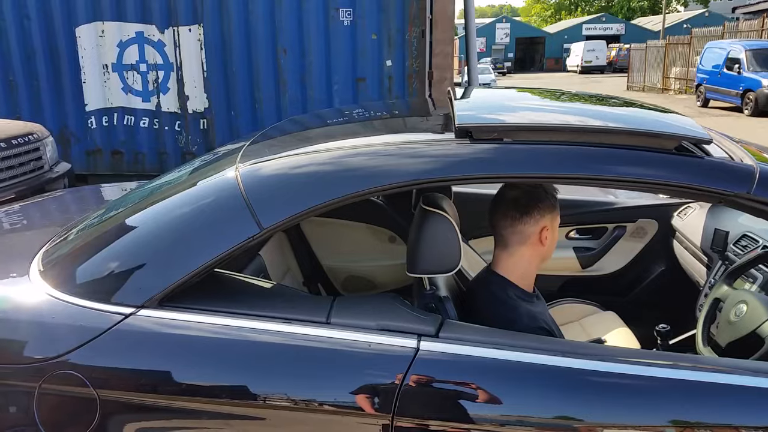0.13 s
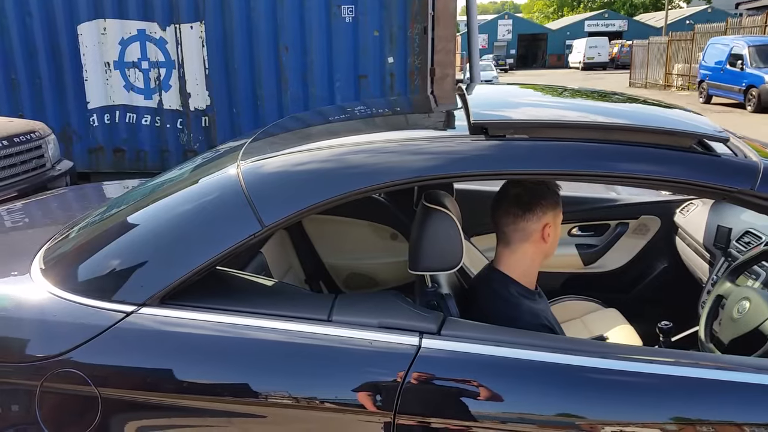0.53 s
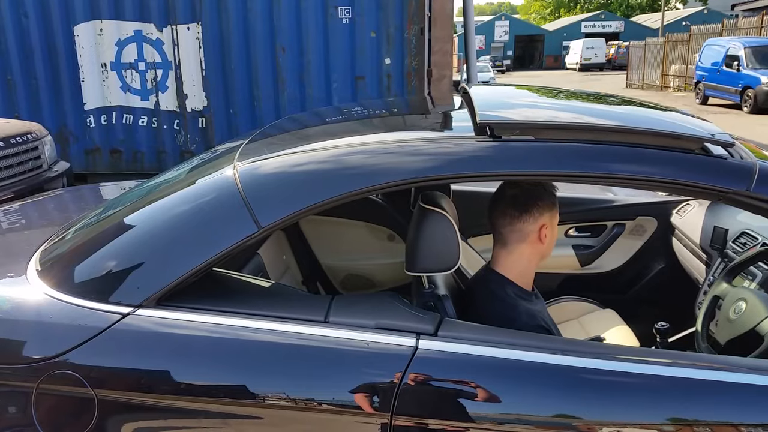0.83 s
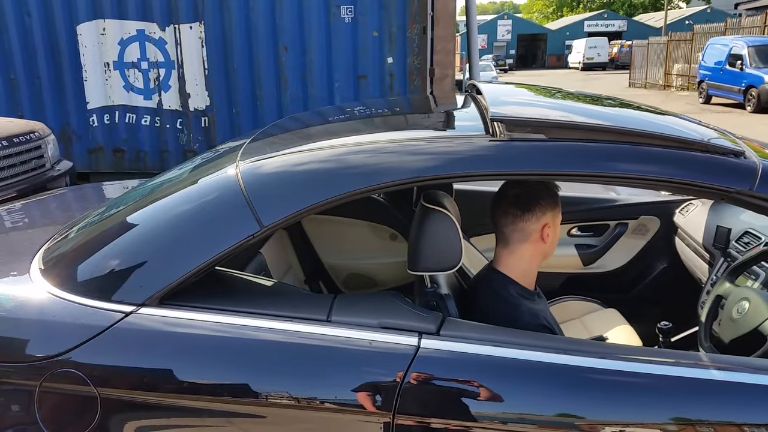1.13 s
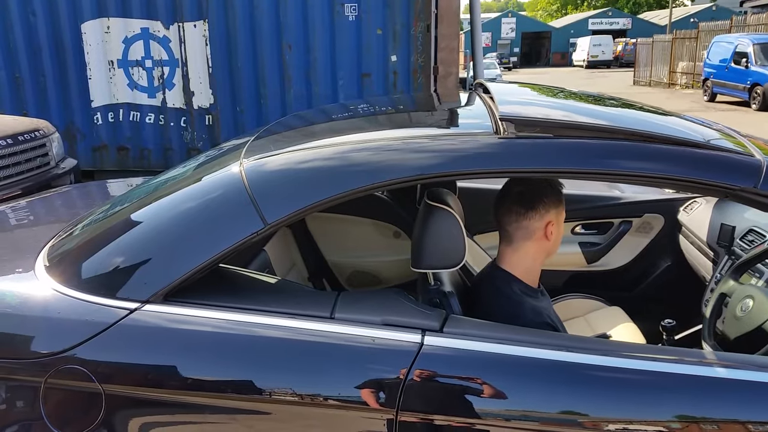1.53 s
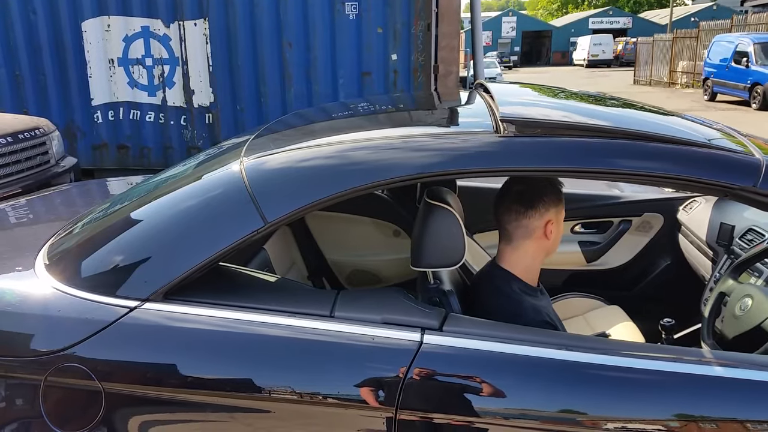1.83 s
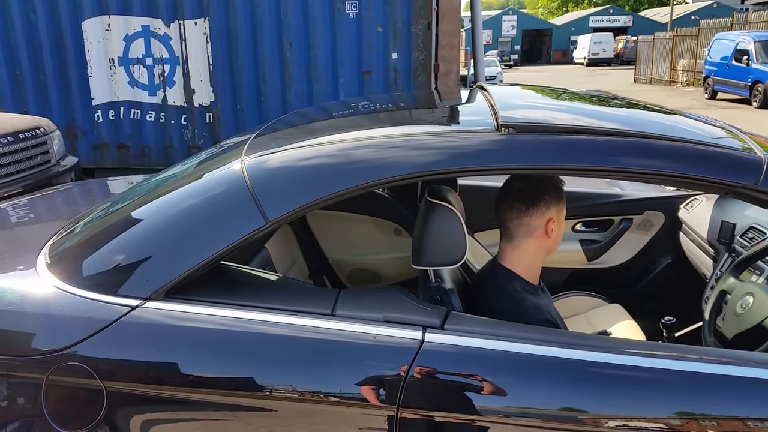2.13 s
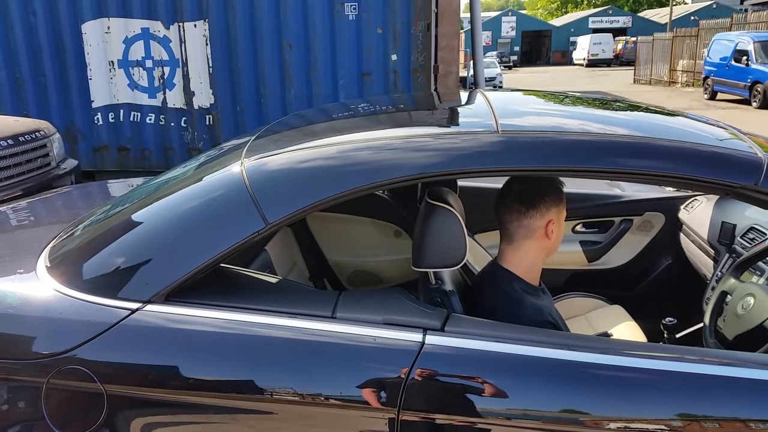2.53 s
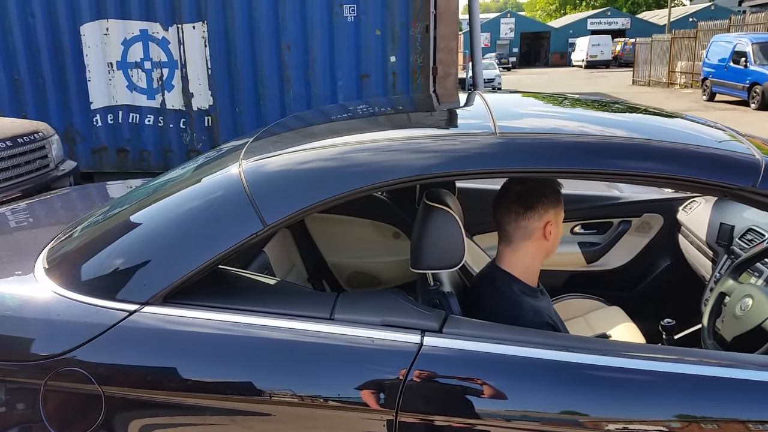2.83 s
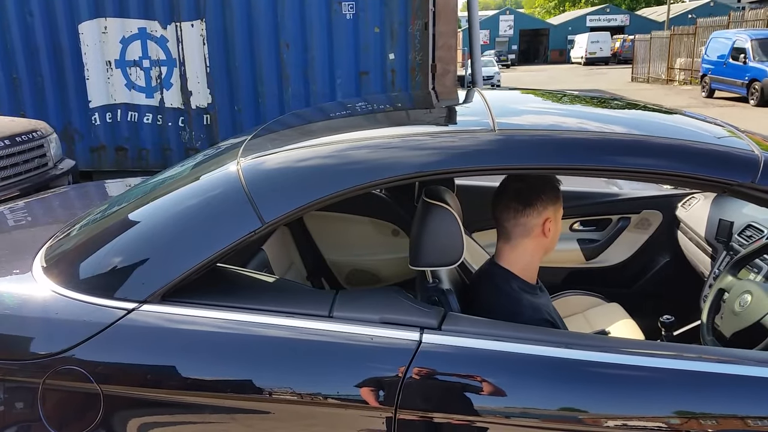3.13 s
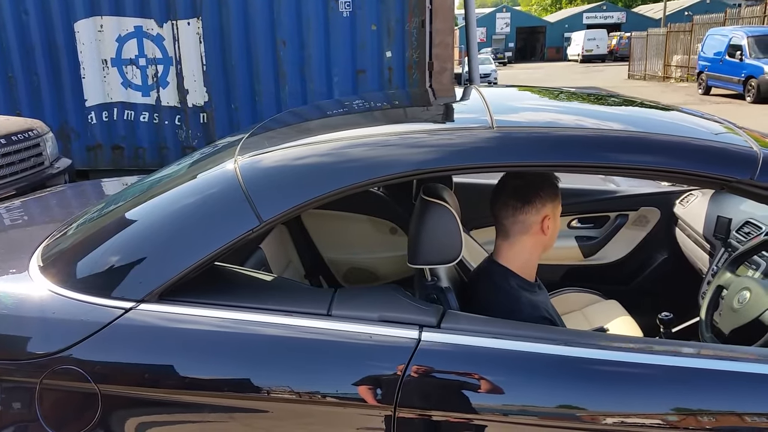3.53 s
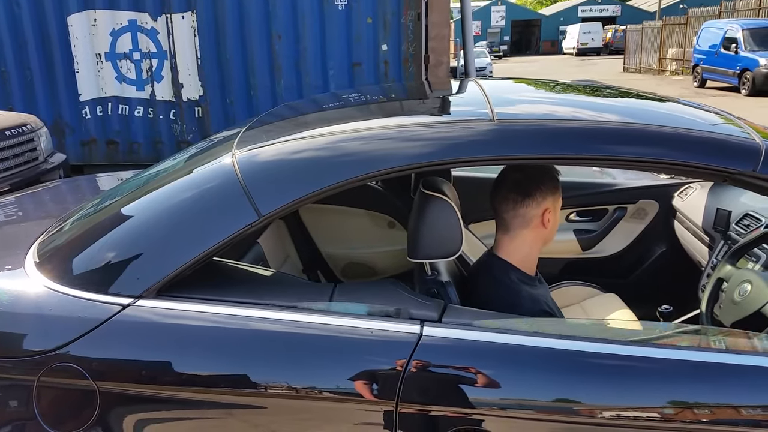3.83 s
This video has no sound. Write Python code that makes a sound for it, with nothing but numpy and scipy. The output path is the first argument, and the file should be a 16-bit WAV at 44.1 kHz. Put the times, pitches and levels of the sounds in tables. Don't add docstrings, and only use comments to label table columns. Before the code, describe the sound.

A car roof panel motor whines thin and high, sags under load and stops after about a second, with latch knocks and seal rubs; outdoors, close stereo microphone, steady hum, later wind buffeting and a second motor starting.

```python
import sys
import numpy as np
from scipy import signal
from scipy.fft import rfft, irfft
from scipy.io import wavfile

SR = 44100
rng = np.random.default_rng(int(sys.argv[2]) if len(sys.argv) > 2 else 0)


def int16_out(signal):
    q = np.round(np.clip(np.atleast_2d(signal).T, -1, 1) * 32767)
    wavfile.write(sys.argv[1], SR, q.astype(np.int16))


def natural_amplitude(level_db):
    exponent = np.asarray(level_db, float) / 20
    return 10 ** exponent


N = 176400
T = np.arange(N) / SR
PORT_LAG = 17


def evened(x):
    return x / np.sqrt(np.mean(x ** 2) + 1e-20)


def read(points, hz):
    f, value = np.transpose(points)
    return np.interp(np.log(hz + 1), np.log(f + 1), value)


def curve(table, axis, t=T):
    rows = np.array(table)
    return np.interp(t, rows[:, 0], rows[:, axis])


def coloured(points, channels=1, slope_db=30):
    hz = np.fft.rfftfreq(N, 1 / SR)
    octaves_outside = np.log2(np.maximum(points[0][0] / (hz + 1), 1) * np.maximum(hz / points[-1][0], 1))
    white = rfft(rng.standard_normal((channels, N)))
    return evened(irfft(white * natural_amplitude(read(points, hz) - slope_db * octaves_outside), N))


def slow(rate_hz, channels=1):
    return coloured([(rate_hz / 20, 0), (rate_hz, -8)], channels=channels)


def bump(at, length, t=T):
    u = np.clip((t - at) / length + 0.4, 0, 12)
    return u / 0.27 * np.exp(1 - u / 0.35)


def place(x, pan_db, lag):
    return np.array([np.roll(x, lag) * natural_amplitude(pan_db / 2), x * natural_amplitude(-pan_db / 2)])


def spread(pair):
    # f/Hz, coherence
    alike = [(60, 1), (250, 0.91), (700, 1), (1500, 0.23), (3000, 0.26), (6000, 0.032)]
    # f/Hz, left over right level/dB
    lean_table = [(150, 0.5), (300, 2.5), (1300, 3), (2200, -3), (4200, 9.5), (12000, 3)]
    hz = np.fft.rfftfreq(N, 1 / SR)
    right, other = rfft(pair)
    same = np.clip(read(alike, hz), 0, 1)
    lean = natural_amplitude(read(lean_table, hz) / 2)
    lag = PORT_LAG * np.minimum(hz / 1300, 1)
    delayed = right * np.exp(-2j * np.pi * hz * lag / SR)
    left = same * delayed + np.sqrt(1 - same ** 2) * other
    return irfft([lean * left, right / lean], N)


def roof_motor():
    # t/s, high level/dB, low whine level/dB
    effort = [
        (0, -52, -62),
        (.17, -54, -57),
        (.28, -52.5, -64),
        (.55, -53, -65),
        (.64, -55.5, -59.5),
        (.88, -58, -56.5),
        (1, -55, -62),
        (1.33, -58, -58),
    ]
    # t/s, f/Hz
    speed = [
        (0, 340.5),
        (.09, 336.5),
        (.34, 342.9),
        (.55, 346.6),
        (.69, 315.2),
        (.75, 311.1),
        (.86, 309.3),
        (1.04, 308.25),
        (1.335, 308.1),
    ]
    # f/Hz, level/dB
    case = [(12550, -74), (12947, -60.5), (13561, -70), (13873, -70), (14150, -71), (14450, -69),
            (14793, -70), (15106, -68)]
    # f/Hz, level/dB per Hz
    brush_spectrum = [(6180, -20), (10500, -21), (11200, -17), (11900, -14), (12500, -1), (14200, 7),
                      (15000, 6), (15900, -9.5)]
    teeth, stop_s, stop_t60 = 7, 1.335, .12
    case_width_hz, case_base_db = 120, -76
    port_lag_s = 0.000338
    n = int(1.9 * SR)
    t = T[:n]
    after = np.maximum(t - stop_s, 0)
    shaft_hz = (curve(speed, axis=1, t=t) - 53 * after) / teeth
    turn = 2 * np.pi * np.cumsum(shaft_hz) / SR
    stop = natural_amplitude(-60 * after / stop_t60)
    run = np.maximum(stop, natural_amplitude(-13 - 60 * after / 1.3))

    tones, step = np.zeros((2, n)), slice(0, n, 128)
    light = np.clip((teeth * shaft_hz[step] - 312) / 25, 0, 1)
    waver = slow(20, channels=8)[:, step]
    for k in range(240, 364):
        f = k * shaft_hz[step]
        a, b, c = rng.random(3)
        ring = sum(natural_amplitude(2 * db) / (1 + ((f - centre) / case_width_hz) ** 4) for centre, db in case)
        ring = ring * natural_amplitude(2 * -6 * light)
        ring = ring + light * natural_amplitude(2 * -67) / (1 + ((f - 14150) / 550) ** 4)
        ring = ring * natural_amplitude(2 * 3 * light * waver[k % 8])
        level = np.sqrt(ring + natural_amplitude(2 * (case_base_db + read(brush_spectrum, f))))
        level = level * (f < 15790)
        if k % teeth:
            level = np.minimum(level, natural_amplitude(case_base_db + 10)) * natural_amplitude(-17 + 3.5 * (4 * c - 2))
        phase = 2 * np.pi * np.array([[a], [a + k * 44 * port_lag_s + 0.42 * b]])
        tones += np.interp(t, t[step], level) * np.cos(k * turn + phase)

    brush = coloured(brush_spectrum, channels=2)[:, :n] * (1 + 0.3 * np.cos(teeth * turn))
    high = natural_amplitude(-2.2) * stop * evened(tones) + natural_amplitude(-4) * brush
    pan_db = -3.5 / 2 * np.array([[1], [-1]])
    high = high * natural_amplitude(curve(effort, axis=1, t=t) + pan_db)
    low = np.cos(3 * teeth * turn)
    low = low + natural_amplitude(-9) * np.cos(2 * teeth * turn) + natural_amplitude(-14) * np.cos(4 * teeth * turn)
    low = low * natural_amplitude(curve(effort, axis=2, t=t) + 3) * stop
    return np.pad((high + place(low, 4, lag=8)) * run, ((0, 0), (0, N - n)))


def late_motor():
    # t/s, whine f/Hz, level/dB
    start = [
        (3.74, 905, -66),
        (3.82, 925, -62),
        (3.9, 948, -57),
        (4, 962, -56),
    ]
    turn = 2 * np.pi * np.cumsum(curve(start, axis=1)) / SR
    rise = np.clip((T - start[0][0]) / 0.019, 0, 1)
    return place(rise * natural_amplitude(curve(start, axis=2) + 6.5) * np.cos(turn), 4.6, lag=3)


def latches():
    # t/s, strength level/dB, tick level/dB, length/s
    knocks = [
        (.19, -36, -68, .028),
        (.572, -39, -76, .022),
        (.893, -45, -63, .015),
        (1.046, -37, -68, .012),
        (1.345, -44, -78, .04),
        (3.645, -37, -84, .04),
        (3.69, -40, -82, .05),
        (3.742, -40, -76, .022),
    ]
    # t/s, length/s, level/dB
    rubs = [
        (0.53, 0.38, -70),
        (1.207, 0.72, -73.5),
        (1.82, 0.33, -77),
        (3.78, 0.5, -77),
    ]
    # f/Hz, level/dB
    knock_spectrum = [(150, -3), (320, 3), (800, -3), (1550, -9), (2000, -22), (3500, -36)]
    # f/Hz, level/dB
    tick_spectrum = [(5000, -16), (6500, 14), (7600, -11), (9000, 10), (14000, -7.5)]
    body = sum(natural_amplitude(db - 7.5) * bump(s, length) for s, db, _, length in knocks)
    tick = sum(natural_amplitude(bright - 6.5) * bump(s, 1.7 * length) for s, _, bright, length in knocks)
    rub = sum(natural_amplitude(db) * np.exp(-((T - s) / length * 2) ** 2) for s, length, db in rubs)
    rub_hz, width_hz = 8600, 800
    band = [(rub_hz - width_hz, -9), (rub_hz, 0), (rub_hz + width_hz, -7)]
    knocking = body * coloured(knock_spectrum, channels=2)
    ticking = tick * coloured(tick_spectrum, channels=2)
    rubbing = rub * coloured(band, channels=2, slope_db=6.0)
    return spread(knocking + ticking + rubbing)


def taps():
    # t/s, ring level/dB, tick level/dB
    hits = [
        (.188, -45, -70),
        (.1912, -43, -68),
        (.1953, -42.5, -64),
        (.1988, -43, -70),
        (.568, -39, -78),
        (1.0443, -40, -54),
        (3.739, -42, -74),
        (3.751, -42, -70),
    ]
    # f/Hz, level/dB, t60/s
    modes = [(330, 2, .025), (750, -2, .02), (1550, -4, .018), (2300, -10, .014), (3900, -15, .008)]
    tick_hz, tick_s, rise_s = 8570, .0005, .0004
    out, t = np.zeros(N), T[:1500]
    tunings = rng.uniform(.85, 1.15, (len(hits), len(modes) + 1))
    for (s, db, tick_db), tune in zip(hits, tunings):
        ring = sum(natural_amplitude(db + mode_db - 60 * t / t60) * -np.sin(2 * np.pi * hz * k * t)
                   for (hz, mode_db, t60), k in zip(modes, tune))
        tick = natural_amplitude(tick_db) * t / tick_s * np.exp(1 - t / tick_s)
        tick = tick * np.sin(2 * np.pi * tick_hz * tune[-1] * t)
        out[round(s * SR):][:len(t)] += ring * (1 - np.exp(-t / rise_s)) + tick
    return place(out, 9, lag=PORT_LAG)


def wind():
    # t/s, level/dB
    strength = [(0, -41), (.35, -40.5), (.68, -47.5), (.95, -44.5), (1.1, -51), (1.7, -48), (2.2, -64),
                (2.9, -44.5), (3.07, -44), (3.11, -29), (3.27, -32.5), (3.33, -38.5), (3.7, -31), (4, -40)]
    # f/Hz, level/dB
    calm = [(20, -6), (45, 2), (100, -2), (200, -18), (400, -47.5), (800, -59)]
    gusty = [(20, -21), (50, 1.5), (110, 0), (190, -5.5), (330, -16), (600, -53.5), (1000, -67)]
    # t/s, peak level/dB, swing
    # f/Hz
    slaps_left = [(0.006, -21, 105), (0.042, -26, 133), (0.23, -28, 60), (0.275, -28, 77),
                  (0.294, -25, 120), (0.331, -27, 126), (0.5, -21, 80), (0.525, -27, 82), (0.569, -25, 73),
                  (0.867, -30, 139), (0.892, -28, 76), (0.915, -27, 77), (0.942, -26, 82), (0.987, -24, 72),
                  (1.344, -31, 160), (1.705, -27, 73), (2.659, -29, 115), (2.721, -29, 86),
                  (2.843, -29, 78), (2.958, -28, 96), (2.977, -25, 90), (3.124, -15, 110), (3.142, -8, 103),
                  (3.165, -20, 94), (3.184, -16, 79), (3.205, -7, 108), (3.24, -20, 120), (3.27, -9, 99),
                  (3.337, -19, 72), (3.359, -22, 112), (3.413, -18, 90), (3.432, -23, 86), (3.488, -20, 91),
                  (3.505, -18, 93), (3.576, -17, 79), (3.597, -20, 108), (3.622, -21, 123),
                  (3.669, -20, 102), (3.697, -16, 125), (3.72, -17, 131), (3.801, -21, 92),
                  (3.827, -23, 108), (3.896, -24, 96), (3.937, -25, 64)]
    slaps_right = [(0.011, -26, 110), (0.073, -14, 158), (0.093, -22, 103), (0.137, -16, 100),
                   (0.241, -27, 60), (0.493, -29, 94), (0.734, -26, 84), (0.766, -27, 72), (0.876, -20, 94),
                   (0.931, -21, 83), (0.95, -29, 92), (0.982, -26, 80), (1.0, -29, 93), (1.036, -28, 94),
                   (2.903, -32, 74), (2.924, -29, 88), (3.09, -11, 140), (3.117, -10, 119),
                   (3.147, -13, 138), (3.186, -13, 87), (3.211, -16, 126), (3.229, -12, 143),
                   (3.258, -12, 174), (3.28, -11, 100), (3.322, -22, 60), (3.365, -14, 109),
                   (3.402, -24, 72), (3.428, -23, 82), (3.488, -21, 119), (3.506, -12, 114),
                   (3.524, -21, 142), (3.571, -25, 71), (3.678, -27, 95), (3.74, -27, 76), (3.761, -25, 85),
                   (3.791, -22, 185), (3.813, -27, 119), (3.834, -21, 111), (3.891, -27, 66),
                   (3.939, -25, 117),
                   (3.095, -26, 430), (3.221, -15, 270)]
    calm_db, gusty_db = -41, -24.5
    swings = np.zeros((2, N))
    level = natural_amplitude(curve(strength, axis=1) + 2 * slow(25, channels=2))
    for port, rows in enumerate((slaps_left, slaps_right)):
        for (s, db, hz), start in zip(rows, rng.random((len(rows), 2))):
            near = slice(max(int((s - .05) * SR), 0), int((s + .2) * SR))
            u = T[near] - s
            swing = np.sign(start[0] - .5) * np.cos(2 * np.pi * hz * u)
            edge = natural_amplitude(-21) * np.cos(2 * np.pi * (3 * hz * u + start[1]))
            swings[port, near] += natural_amplitude(db) * np.exp(-(u * hz / 0.85) ** 2) * (swing + edge)
            level[port, near] += natural_amplitude(db - 22) * bump(s, .025, t=T[near])
    mix = np.clip((20 * np.log10(level) - calm_db) / (gusty_db - calm_db), 0, 1)
    calm_part = np.sqrt(1 - mix) * coloured(calm, channels=2)
    gusty_part = np.sqrt(mix) * coloured(gusty, channels=2)
    return swings + level * (calm_part + gusty_part)


def pump():
    # f/Hz, level/dB, left over right level/dB, phase by which the left leads/rad
    lines = [(191.9, -59, 1, .1), (296.7, -56.5, 5, .3), (384.1, -60, 1, -.2), (580.8, -61.5, 0, -1.4),
             (672.2, -70.5, -1, -1.3), (720.2, -73, -2, -.3), (768.1, -73, 3, .3), (864.2, -61, 2, -1),
             (912.2, -68, 4, -.5), (1013.2, -73, 7, -2.1), (1186.3, -71, 6, 2.5), (1392.3, -74, 3, 2.3),
             (2308, -75.5, -3, .9)]
    level = slow(1.77, channels=len(lines))
    phase = slow(6, channels=len(lines))
    side = np.array([[.5], [-.5]])
    out = np.zeros((2, N))
    for (hz, db, pan, lead), w, p in zip(lines, level, phase):
        angle = 2 * np.pi * (hz * T + rng.random()) + 0.22 * p + side * lead
        out += natural_amplitude(db + 6.0 + side * pan + .9 * w) * np.cos(angle)
    return out


def squeak():
    # f/Hz, level/dB
    tones = [(6550, -88), (11400, -82)]
    start_s, length_s = 3.19, .19
    on = np.clip(np.minimum(T - start_s, start_s + length_s - T) / 0.016, 0, 1)
    return sum(on * natural_amplitude(db) * np.cos(2 * np.pi * hz * T) for hz, db in tones)


def yard():
    # f/Hz, level/dB per Hz
    rumble = [(24, -17.5), (40, 3), (233, -2), (295, -5.5), (434, -10.5), (794, -16.5), (871, -10.5),
              (1100, -17.5), (3200, -25), (4160, -87), (7040, -120)]
    hiss_spectrum = [(3300, -12), (3700, 1.5), (4200, -6), (4800, -14), (5150, -35), (7500, -38),
                     (9500, -34), (15500, -20.5)]
    # t/s, level/dB
    drift = [(0, -60), (1.2, -60.5), (2.3, -65), (3.4, -63), (4, -59)]
    drift_db = .7 * (curve(drift, axis=1) + 66)
    far = coloured(rumble, channels=2) * natural_amplitude(-48.5 + drift_db + 0.5 * slow(8.2))
    hiss = coloured(hiss_spectrum, channels=2, slope_db=48.5) * natural_amplitude(-58.5 + 0.51 * slow(45))
    return spread(far + hiss)


def scene():
    mechanism = roof_motor() + late_motor() + latches() + taps()
    return mechanism + wind() + pump() + squeak() + yard()


def band_limit(x):
    return signal.sosfilt(signal.butter(12, 15790, fs=SR, output="sos"), x)


def record(dry):
    return band_limit(dry)


dry = scene()
out = record(dry)
int16_out(out)
```